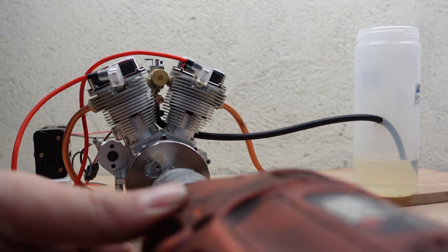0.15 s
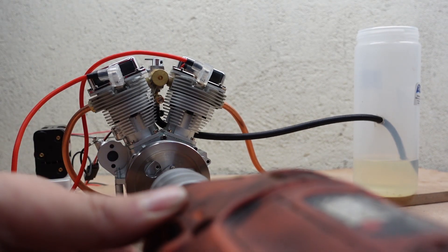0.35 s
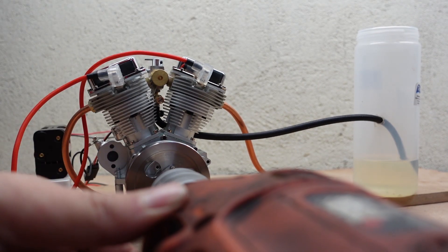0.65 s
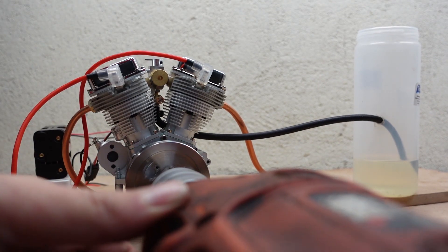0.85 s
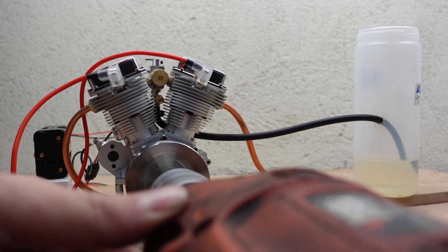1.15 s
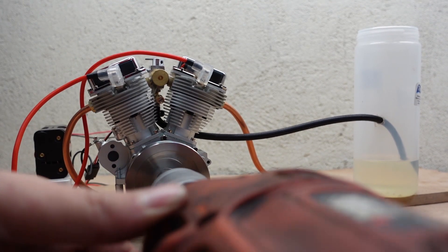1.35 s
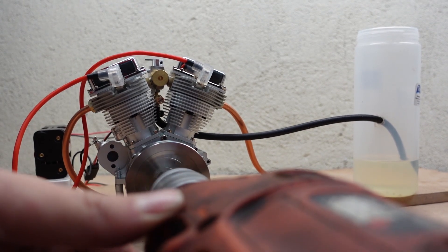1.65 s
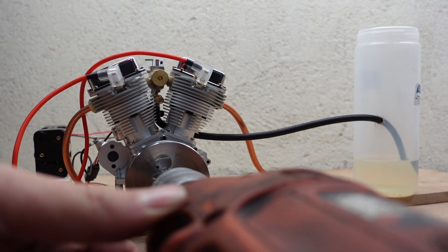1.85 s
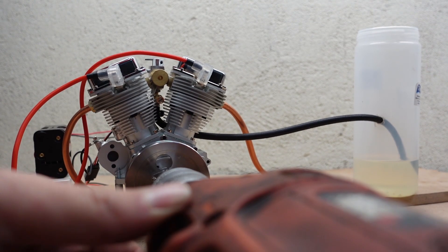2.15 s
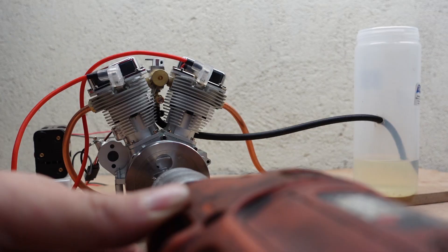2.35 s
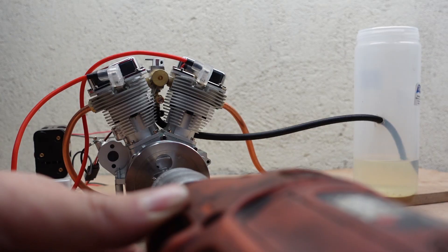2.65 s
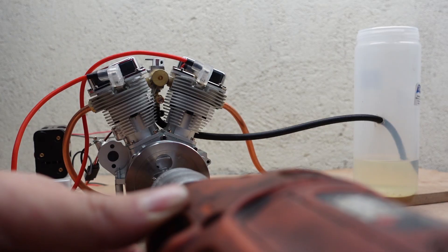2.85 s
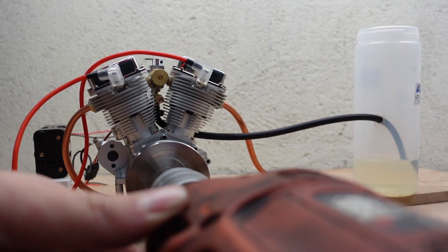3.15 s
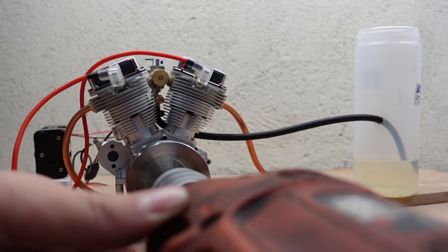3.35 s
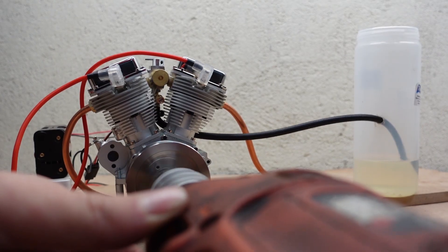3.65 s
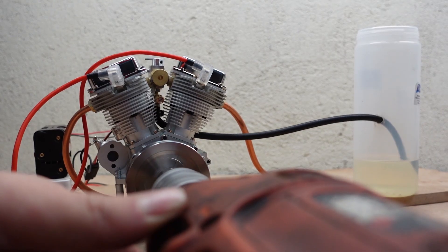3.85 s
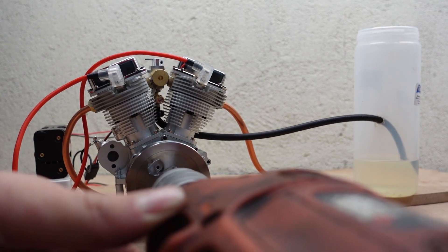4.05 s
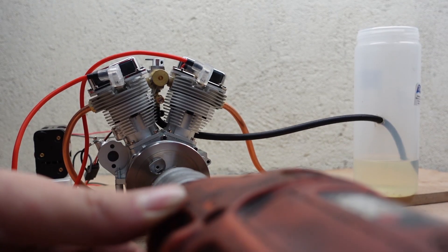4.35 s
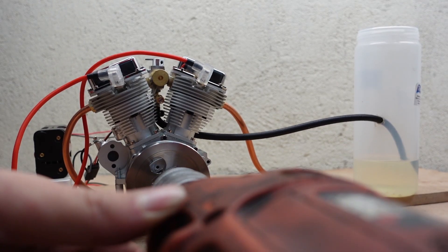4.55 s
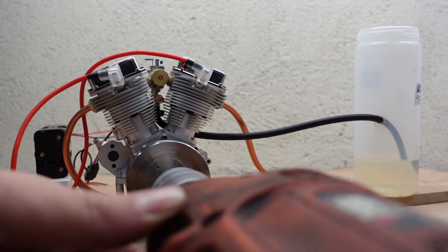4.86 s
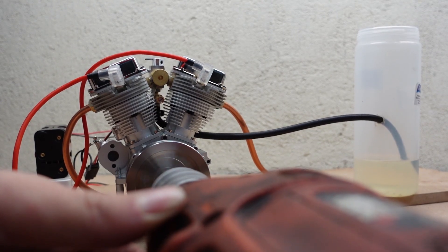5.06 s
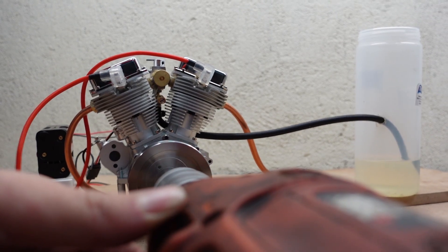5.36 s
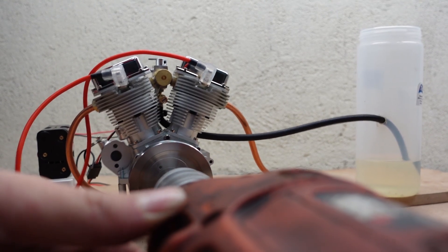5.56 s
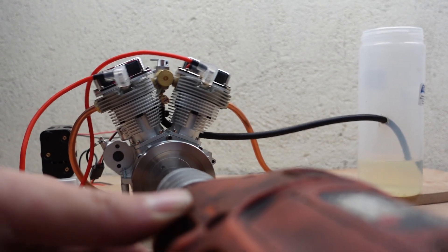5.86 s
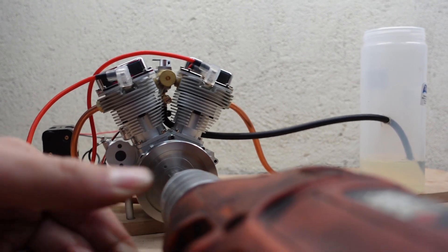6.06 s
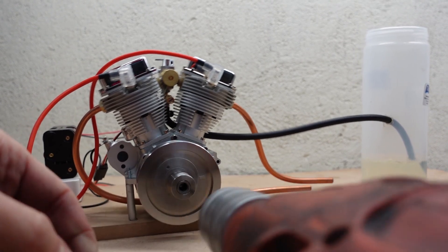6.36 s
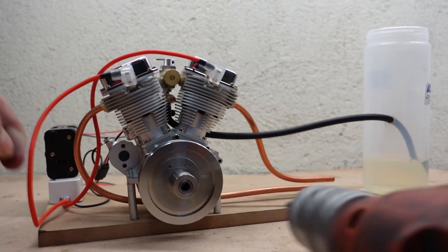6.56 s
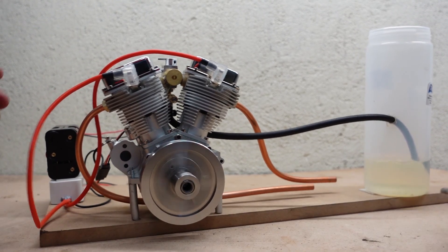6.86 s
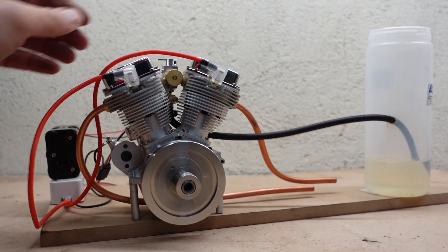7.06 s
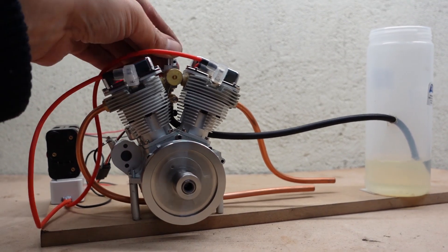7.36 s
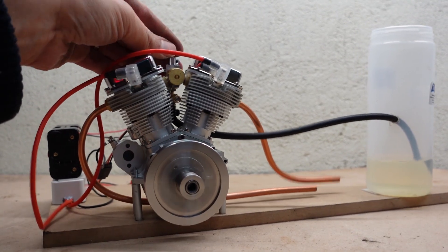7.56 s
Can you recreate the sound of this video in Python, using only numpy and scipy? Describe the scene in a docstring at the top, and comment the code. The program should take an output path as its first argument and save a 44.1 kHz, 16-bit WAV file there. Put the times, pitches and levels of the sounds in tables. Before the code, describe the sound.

A handheld electric drill whines and rattles in three bursts, cranking a tiny two-cylinder engine until it catches and pops along unevenly on its own.

```python
"""In a small room, a hand drill cranks a tiny two-cylinder engine on a wooden board, close to the microphone.
The gears rattle and the motor whines in three bursts: pitch and level curves drive noise, taps and partials.
Between bursts the hand resets the drill with small clicks of ringing plastic and soft rustle.
In the third burst the engine catches and runs on alone: cracks are pressure pulses, gas and clatter are
filtered noise. The board hums through resonances, and sparse echoes make the room."""
import sys
import numpy as np
from scipy import signal
from scipy.fft import rfft, irfft
from scipy.io import wavfile
from scipy.ndimage import uniform_filter1d

SR = 44100
rng = np.random.default_rng(int(sys.argv[2]) if len(sys.argv) > 2 else 0)


def output_pcm(signal):
    """Save a mono or channel-first signal as 16-bit PCM at the path in sys.argv[1].

    Samples are clipped to [-1, 1] before scaling.
    """
    pcm = np.clip(np.atleast_2d(signal).T, -1, 1) * 32767
    wavfile.write(sys.argv[1], SR, np.round(pcm).astype(np.int16))


N = 340011

# drill, one table a burst: time_s, motor_pitch_hz, gear_rattle_db, whine_db, lowest_partial_db
DRILL = [
    [(.307, 422.3, -25.5, -51, -62), (.37, 921, -23.5, -35, -52), (.41, 1152, -23.5, -26.5, -55),
     (.46, 1383, -24, -28.5, -32), (.57, 1290, -22, -38, -46.5), (.66, 1165, -22, -28, -46.5),
     (.78, 1056, -21.5, -25.5, -49), (.914, 938, -22, -28.5, -48), (.96, 830, -23, -25, -36.5),
     (1.01, 761.6, -20.5, -28.5, -53), (1.11, 685, -21, -29, -47), (1.2, 606.5, -21, -31, -43.5),
     (1.5, 388, -21, -43.5, -53), (1.8, 261, -22, -57.5, -63), (1.851, 248, -25, -60, -65),
     (1.88, 241, -34.5, -60, -65)],
    [(2.938, 497.3, -26, -50, -55.5), (2.975, 999.5, -23, -39, -46), (3.038, 1015, -23.5, -27, -57),
     (3.346, 754, -21.5, -30, -54), (3.6, 564, -21, -37, -50), (4.063, 314, -22, -60, -58),
     (4.15, 280, -23.5, -58, -65), (4.203, 260, -28.5, -60, -65), (4.225, 251, -70.5, -60, -65)],
    [(4.762, 300, -28, -50, -55), (4.792, 472.2, -21.5, -40, -42), (4.82, 802, -23, -31, -45),
     (4.875, 1147, -23.5, -26, -39), (5.068, 959.5, -21.5, -27.5, -44), (5.296, 767, -22.5, -30, -59),
     (5.5, 663, -22.5, -32, -56), (5.888, 380, -21.5, -60, -65), (6.218, 280, -26, -60, -65),
     (6.26, 269, -53, -60, -65)],
]
# spectrum of moving gas: freq_hz, density_db (per Hz)
GAS = [(2940, -14.5), (5000, -5.5), (7710, -0.5), (9290, 1.5), (10800, 2.5), (12000, 1.5), (13200, 5.5),
       (14900, 4), (15700, 6), (16200, -15)]
# spectrum of scraping and sliding: freq_hz, density_db (per Hz)
SCRAPE = [(180, -67.5), (300, -32.5), (543, -11.5), (685, -13), (1200, -17), (1510, -5.5), (2210, -3.5),
          (7020, -19.5), (9600, -26.5), (15500, -29)]


def gain_of(db):
    """Decibels to an amplitude factor."""
    return 10 ** (np.asarray(db) / 20)


def evened(x):
    """Scales to rms 1."""
    return x / np.sqrt(np.mean(x ** 2) + 1e-20)


def read(points, hz):
    """Reads a spectrum on a log frequency axis."""
    f, value = np.transpose(points)
    return np.interp(np.log(hz + 1), np.log(f + 1), value)


def play(rows):
    """Columns of a curve at every sample, and a gate that is open while it lasts."""
    s, *columns = np.transpose(rows)
    t = np.arange(N) / SR
    gate = np.interp(t, [s[0] - .003, s[0], s[-1], s[-1] + .01], [0, 1, 1, 0])
    return gate, [np.interp(t, s, c) for c in columns]


def swells(rows):
    """Summed smooth humps, one row of gains for each dB column."""
    t = np.arange(N) / SR
    total = 0
    for middle_s, length_s, *db in rows:
        hump = np.cos(np.pi * np.clip((t - middle_s) / length_s, -.5, .5)) ** 2
        total = total + gain_of(db)[:, None] * hump
    return total


def add(mix, s, sound):
    """Mixes a sound in at time s."""
    part = mix[round(s * SR):][:len(sound)]
    part += sound[:len(part)]


def colour(x, points, modes=()):
    """Causal filter of unit energy: a smooth spectrum with resonant lifts or dents."""
    hz = abs(np.fft.fftfreq(8192, 1 / SR))
    db = read(points, hz) + sum(lift / (1 + (2 * (hz - f) / w) ** 2) for f, w, lift in modes)
    log_gain = np.log(gain_of(np.maximum(db, -100)))
    # minimum phase: the filter responds as early as its spectrum allows
    taps = np.fft.ifft(np.exp(np.conj(signal.hilbert(log_gain)))).real[:2048]
    return signal.oaconvolve(x, taps / np.linalg.norm(taps))[:len(x)]


def resonate(x, hz, width):
    """A resonance of gain 1 and given width in Hz that follows the curve hz."""
    turn = np.exp(2j * np.pi * np.cumsum(hz * np.ones(len(x))) / SR)
    r = np.exp(-np.pi * width / SR)
    # shift the tone down to 0 Hz, smooth there, shift back
    return 2 * (turn * signal.lfilter([1 - r], [1, -r], x / turn)).real


def knocks(per_s, jitter, spread_db, ring_s):
    """Envelope of uneven knocks, each swelling and dying within a few ring_s."""
    wander = evened(uniform_filter1d(rng.standard_normal(N), size=300))
    turns = np.cumsum(per_s * np.maximum(1 + jitter * wander, 0)) / SR
    hits = np.diff(np.floor(turns), prepend=0) * gain_of(spread_db * rng.standard_normal(N))
    r = np.exp(-1 / (ring_s * SR))
    return evened(signal.lfilter([1], [1, -2 * r, r * r], hits))


def quiet():
    """Faint air of the room and hiss of the microphone: noise mostly common to both sides."""
    # background spectrum: freq_hz, density_db (per Hz)
    floor_points = [(18, -62), (30, -20.5), (245, -15.5), (319, -12), (355, -12), (384, -21), (569, -19),
                    (1540, -23.5), (9970, -36.5), (13000, -36), (16000, -34)]
    both, left, right = (colour(v, floor_points) for v in rng.standard_normal((3, N)))
    return gain_of(-69.5) * (both + .2 * np.array([left, right]))


def room(x):
    """Sparse echoes of random sign, partly shared by the two sides, each band dying at its own speed."""
    # reverberation: freq_hz, t60_s
    decay = [(150, 0.71), (1000, 0.46), (4000, 0.5), (9000, 0.54), (16000, 0.73)]
    taps = np.zeros((2, SR))
    # one echo in every 20 samples
    at = np.arange(100, SR - 20, 20) + rng.integers(0, 20, (2, (SR - 101) // 20))
    np.put_along_axis(taps, at, rng.choice([-1., 1.], at.shape), 1)
    hz, t, z = signal.stft(taps, SR, nperseg=256)
    tail = signal.istft(z * gain_of(-60 * t / read(decay, hz)[:, None]), SR, nperseg=256)[1]
    tail = tail + 0.5 * tail[::-1]
    return signal.fftconvolve(x[None], tail / np.linalg.norm(tail[0]), axes=1)[:, :N]


def ports(x):
    """The camera body and the table scatter the sound differently to the two microphone ports."""
    # left-right unlikeness of the near sound: freq_hz, side_db
    unlikeness = [(100, -25), (300, -16), (1000, -16), (2500, -25.5), (5000, -23), (15000, -15.5)]
    hz = np.fft.rfftfreq(2048, 1 / SR)
    k = np.arange(2048)
    scatter = rng.standard_normal(2048) * np.exp(-k / 250.) * (k > 60)
    taps = irfft(rfft(scatter / np.linalg.norm(scatter)) * gain_of(read(unlikeness, hz)))[:1500]
    side = signal.oaconvolve(x, taps)[:N]
    return np.array([x + side, x - side])


def board():
    """The crank shakes the board and keeps its modes humming; the third rings along with the second."""
    # steady shaking: time_s, low_mode_db, second_mode_db
    shake = [(.28, -86, -80), (.32, -61, -60.5), (.59, -81, -76), (1.4, -56, -59), (1.89, -57.5, -59),
             (2.27, -93.5, -92), (2.91, -70, -68.5), (2.95, -58, -62), (3.2, -56, -58), (3.59, -58, -62),
             (4.25, -54, -59.5), (4.54, -78, -85), (4.71, -90.5, -88), (4.77, -59, -68), (4.95, -51, -56.5),
             (5.23, -55, -54), (5.43, -41, -40), (6.3, -46, -33.5), (6.45, -42, -41), (7.71, -40, -39.5)]
    # throbs of the hum: middle_s, length_s, low_mode_db, second_mode_db
    throbs = [(1.6, .2, -46, -56), (3.66, 0.1, -46, -66), (3.9, 0.29, -46, -59), (4.2, .16, -42.5, -49),
              (5.33, 0.15, -41, -36), (5.74, 0.13, -33, -51), (6.03, 0.15, -34.5, -37),
              (6.32, 0.27, -41, -33), (6.54, 0.2, -40, -36), (6.71, 0.12, -36, -34),
              (6.79, .08, -41, -36.5), (6.87, 0.085, -33, -43), (6.92, 0.13, -50, -35.5),
              (7.01, 0.091, -36, -31), (7.17, 0.15, -39, -40), (7.33, 0.12, -38, -34),
              (7.58, 0.17, -40, -34), (7.7, 0.071, -38, -36)]
    # wooden modes: freq_hz, width_hz
    modes = [(117, 19), (184, 19), (350, 35)]
    gate, levels_db = play(shake)
    low, second = np.hypot(gate * gain_of(levels_db), swells(throbs))
    jolts = rng.standard_normal(N) * (.8 + knocks(33., .3, 1.5, 0.0044))
    out = np.zeros(N)
    for level, (hz, w) in zip((low, second, second * gain_of(-7.5)), modes):
        ring = evened(resonate(resonate(jolts, hz, w), hz, 2.9 * w))
        # partly level the ring's random swells, so the curves set the hum's loudness
        levelled = ring / (uniform_filter1d(ring ** 2, size=1300) + .1) ** 0.34
        out += level * evened(levelled)
    return out


def handling():
    """Plastic clicks: a noisy snap, a bright tick, a hollow knock and a short ring that shifts with the grip."""
    # trigger, chuck and hand, before the trims below: start_s, snap_and_ring_db, hollow_knock_db, bright_tick_db
    clicks = [(0.164, -48, -69.5, -62.5), (0.1984, -46.5, -61, -73.5), (0.2029, -36.5, -62, -58),
              (0.2134, -40.5, -49, -48), (0.2264, -38.5, -45, -33), (0.2583, -47, -51, -54),
              (0.2683, -47.5, -57, -60), (0.2867, -40, -52.5, -49), (0.3035, -19, -43.5, -36),
              (0.3086, -28, -35, -34), (2.2438, -50.5, -67, -67), (2.2897, -40, -49.5, -42.5),
              (2.302, -35, -53, -30), (2.333, -48, -54.5, -55), (2.3453, -45, -56, -61.5),
              (2.4169, -47, -56.5, -66), (2.5387, -37, -56.5, -39.5), (2.5775, -39.5, -49.5, -49),
              (2.5954, -34.5, -38.5, -51.5), (2.6248, -33, -43.5, -41), (2.6365, -30, -45.5, -21.5),
              (2.66, -37.5, -45, -41), (2.7327, -54, -58, -62.5), (2.7731, -30.5, -41, -39),
              (2.7838, -21, -30, -33), (2.886, -33.5, -53.5, -41), (2.8973, -30, -46.5, -22.5),
              (2.9193, -36, -46, -34), (2.9374, -12.5, -33, -21), (4.6848, -38.5, -70, -42),
              (4.7073, -43, -55, -56), (4.7174, -39, -52, -42), (4.7272, -35, -48, -26),
              (4.7451, -37, -43, -27), (4.7641, -15, -37, -23)]
    # shell modes, the lowest being the hollow knock: freq_hz, level_db, t60_s
    shell = [(552, 1, 0.027), (1190, -16.5, 0.014), (2440, -20, 0.031), (3400, -26, .04),
             (4860, -49.5, .04), (8200, -28, .04), (10400, -30.5, 0.043)]
    # fingers sliding on the drill, one table a spell: time_s, rustle_db
    rustle = [
        [(0.13, -82), (0.228, -62), (0.3, -66)],
        [(2.27, -63), (2.36, -68), (2.45, -77), (2.53, -80), (2.604, -53), (2.7, -70), (2.77, -51), (2.87, -63),
         (2.93, -55.5)],
        [(4.68, -73), (4.74, -50), (4.76, -59)],
    ]
    out, t = np.zeros(N), np.arange(4000) / SR
    grit = rng.standard_normal((len(clicks), 2, len(t)))
    grip = 1 + 0.047 * rng.standard_normal((len(clicks), len(shell)))
    hz, ring_db, t60 = np.transpose(shell)[:, :, None]
    rise = np.minimum(t / 0.002, 1)
    snap_band = signal.butter(2, [900, 5500], "band", fs=SR)
    snap = signal.lfilter(*snap_band, grit[:, 0]) * np.exp(-t / 0.0024)
    tick = signal.lfilter(*signal.butter(2, 5500, "high", fs=SR), grit[:, 1]) * np.exp(-t / 0.0013)
    for k, (s, db, knock_db, tick_db) in enumerate(clicks):
        hollow, *upper = gain_of(ring_db - 60 * t / t60) * np.sin(2 * np.pi * hz * grip[k, :, None] * t)
        click = gain_of(db + 6.0) * (snap[k] + sum(upper))
        click += gain_of(tick_db + 7.0) * tick[k]
        click += gain_of(knock_db + 4.5) * hollow
        add(out, s, rise * click)
    slide = sum(gate * gain_of(db) for gate, (db,) in map(play, rustle))
    rubbing = evened(.3 + knocks(110.0, 1.0, 5., 0.0031)) * rng.standard_normal(N)
    return out + colour(slide * rubbing, SCRAPE)


def chuck():
    """The chuck coasts on after the second burst: slow uneven knocks shape scraping noise."""
    # coasting: time_s, scrape_db
    coast = [(4.21, -62), (4.242, -46.5), (4.376, -41), (4.442, -46), (4.47, -63)]
    gate, (db,) = play(coast)
    scrape = evened(0.36 + knocks(100., 0.36, 3.2, 0.0024)) * rng.standard_normal(N)
    return colour(gate * gain_of(db) * scrape, SCRAPE)


def motor():
    """Commutator partials glide with the motor, coloured by the case; the speed control whistles at fixed pitch,
    beside short gliding tones."""
    # levels of partials 2 and 3 against the whine: level_db
    partials_db = 0., -3.5
    # resonance of the case: freq_hz, level_db
    whine_body = [(900, -15), (1420, -10), (1520, -1.5), (2400, -1), (3300, -3), (4200, -15)]
    # short gliding tones, among them the whistle sliding down as a burst starts:
    # start_s, length_s, first_hz, last_hz, level_db
    glides = [(2.94, .06, 4450, 4150, -27), (4.762, 0.061, 4400, 3900, -27), (.5, .2, 1640, 1400, -33),
              (0.47, .1, 3800, 2820, -33), (0.85, 0.11, 3050, 2690, -25), (.53, .11, 15800, 14400, -41.5),
              (.48, .14, 13600, 12200, -47.5)]
    # steady whistle of the speed control, lower tone and octave: pitch_hz
    whistle_hz = 4316, 8910
    # its two tones through a burst, before the trim below: level_db
    whistle_db = -37, -45.5
    # its swells above that, before the same trim: middle_s, length_s, lower_tone_db, octave_db
    whistle_swells = [(.33, .1, -30, -28), (.83, .08, -29, -42), (1.14, 0.13, -23.5, -46),
                      (1.55, .06, -28, -34), (1.68, 0.16, -28, -33.5), (1.8, 0.11, -30, -38),
                      (1.87, 0.069, -31, -47), (2.95, 0.15, -23, -24), (3.8, 0.31, -29, -33.5),
                      (4.04, 0.11, -28.5, -31.5), (4.77, 0.051, -20.5, -31), (5.7, 0.086, -40, -31),
                      (6.03, .1, -38, -29), (6.17, .16, -35, -36)]
    out, whistle = np.zeros(N), np.zeros((2, N))
    flutter = 1 + .3 * evened(uniform_filter1d(rng.standard_normal((3, N)), size=400, axis=1))
    whistle_level = gain_of(whistle_db)[:, None] + swells(whistle_swells)
    for rows in DRILL:
        gate, (hz, _, whine_db, low_db) = play(rows)
        turns = np.cumsum(hz) / SR
        whistle += gate * whistle_level
        upper_db = [whine_db + db + read(whine_body, (k + 2) * hz) for k, db in enumerate(partials_db)]
        for k, db in enumerate([low_db, *upper_db]):
            out += gate * gain_of(db) * np.sqrt(2) * flutter[k] * np.sin(2 * np.pi * (k + 1) * turns)
    for s, length, first_hz, last_hz, db in glides:
        hz = np.linspace(first_hz, last_hz, round(length * SR))
        swell = np.sqrt(2 * np.hanning(len(hz)))
        add(out, s, gain_of(db) * swell * np.sin(2 * np.pi * np.cumsum(hz) / SR))
    # narrow noise gives the whistle its wavering tone
    tones = [evened(resonate(resonate(rng.standard_normal(N), hz, w), hz, w))
             for hz, w in zip(whistle_hz, (150., 50.))]
    return out + gain_of(-5.0) * (whistle * tones).sum(0)


def dips():
    """Gain of the gear noise, which drops briefly as if a piston came against compression."""
    # brief drops: middle_s, depth_db, length_ms
    drops = [(.987, -10, 7.5), (1.053, -23, 8.4), (1.095, -7, 13.7), (1.176, -16, 7.2), (1.215, -10, 11),
             (1.446, -4, 11), (4.082, -10, 25), (4.111, -2, 11), (5.486, -7.5, 13), (5.728, -4, 9),
             (5.868, -4.5, 18.5), (5.904, -5.5, 25), (5.952, -5, 14), (6.037, -8, 8.6), (6.128, -16, 7.9)]
    t = np.arange(N) / SR
    return gain_of(sum(db * np.exp(-(2000 * (t - s) / ms) ** 2) for s, db, ms in drops))


def gears():
    """Teeth slap in the gearbox: gated noise and taps ring the housing; the fan hisses above, the case growls below."""
    # rattle spectrum: freq_hz, density_db (per Hz)
    rattle_points = [(350, -47.5), (600, -13.5), (853, -1.5), (1440, -2.5), (1570, 0.5), (3000, 4),
                     (4210, -3.5), (5170, -7), (5790, -8), (6550, -19), (9000, -35), (11700, -36.5),
                     (19800, -120)]
    # ringing housing: freq_hz, width_hz, lift_db
    housing = [(835, 160, 0.5), (1568, 59, 6), (1777, 55, 4), (2233, 230, 4), (2930, 440, 1),
               (3970, 340, 6.5), (5720, 47, 9), (6930, 47, 20.5)]
    # fan hiss spectrum: freq_hz, density_db (per Hz)
    air_points = [(3530, -28.5), (6000, 1), (6570, -4.5), (8300, -7), (9190, -8), (11600, -12),
                  (15100, -17), (16000, -19.5)]
    # case growl spectrum: freq_hz, density_db (per Hz)
    growl_points = [(60, -36.5), (150, -17), (230, -11), (300, -7), (500, -2), (650, 2), (900, -3),
                    (1500, -30.5)]
    # at free speed, against the rattle: fan_hiss_db, case_growl_db, lumpiness (0-1)
    at_speed = (-8.5, -32.5, 0.22)
    # change of these per octave of slowing: fan_hiss_db, case_growl_db, lumpiness
    per_octave = (-3., 7.5, 0.18)
    free_hz = 1400
    levels, lumpy = np.zeros((3, N)), np.zeros(N)
    for rows in DRILL:
        gate, (hz, db, *_) = play(rows)
        slowing = np.log2(free_hz / hz)
        air_db, growl_db, lump = np.c_[at_speed].T + np.c_[per_octave].T * slowing
        levels += gate * gain_of([db, db + air_db, db + growl_db])
        lumpy += gate * np.clip(lump, 0, 1)
    gating = 1 - lumpy + lumpy * knocks(170, .5, 3.2, 0.00094)
    # level the gating over time, so that lumpiness leaves loudness alone
    noise = rng.standard_normal((3, N)) * gating / np.sqrt(uniform_filter1d(gating ** 2, size=6000) + 1e-9)
    struck = rng.random(N) < 350 / SR  # about 350 taps per second
    taps = struck * rng.choice([-1., 1.], N) * rng.uniform(.5, 1, N)
    taps = evened(taps * np.sqrt(gating))
    share = 0.6 * lumpy
    slaps = np.sqrt(1 - share) * noise[0] + np.sqrt(share) * taps
    rattle, air, growl = dips() * levels * [slaps, noise[1], noise[2]]
    return colour(rattle, rattle_points, housing) + colour(air, air_points) + colour(growl, growl_points)


def running():
    """Tappets and timing gears clatter in the ringing cylinders over the hiss of the intake."""
    # valve gear: time_s, clatter_db
    clatter = [(6.0, -34), (6.26, -31.5), (6.414, -31), (7.076, -36), (7.294, -37.5), (7.71, -32.5)]
    # intake: time_s, hiss_db
    intake = [(5.2, -49), (5.54, -47), (5.91, -40), (6.21, -40), (6.56, -41.5), (7.3, -40.5), (7.71, -39.5)]
    # clatter spectrum: freq_hz, density_db (per Hz)
    metal = [(150, -42.5), (250, 6), (287, -7), (351, 4), (464, -11.5), (833, -4), (1280, -11),
             (1480, -5.5), (1980, -4), (2310, -2), (3000, 1), (4480, -5.5), (10000, -13), (13000, -50),
             (22000, -120)]
    # ring of the cylinders: freq_hz, width_hz, lift_db
    fins = [(796, 870, 4.5), (2990, 97, 8), (5500, 110, 8), (6670, 70, 5), (7740, 160, 7), (10480, 220, 7),
            (12800, 150, -21), (14600, 160, -7)]
    gate, (db,) = play(clatter)
    ticks = rng.standard_normal(N) * evened(1 + 1.4 * knocks(120., .8, 0.67, 0.002))
    open_, (hiss_db,) = play(intake)
    hiss = rng.standard_normal(N) * evened(1 + .5 * knocks(50., 0.42, 12.0, 0.0045))
    return colour(gate * gain_of(db) * ticks, metal, fins) + colour(open_ * gain_of(hiss_db) * hiss, GAS, fins)


def valves():
    """Gas leaking past a valve wheezes: noise swells and fades, tuned by the passages."""
    # wheezes: middle_s, level_db, length_ms (at half height)
    wheezes = [(6.427, -35, 9.2), (6.695, -34, 10), (6.785, -42, 11), (6.81, -35, 12), (6.95, -34, 8.3),
               (7.055, -33, 22), (7.085, -39, 10), (7.275, -30, 12), (7.325, -39, 12), (7.365, -28.5, 11),
               (7.407, -30, 11), (7.44, -40, 7.3), (7.475, -31, 12), (7.51, -31, 14), (7.54, -30, 14),
               (7.62, -32.5, 46), (7.66, -32.5, 23)]
    # resonant passages: freq_hz, width_hz, lift_db
    passages = [(3020, 250, 10), (6700, 150, 17), (7650, 160, 13), (10610, 360, 12.5), (14500, 300, -4)]
    leak = np.zeros(N)
    for s, db, ms in wheezes:
        add(leak, s - ms / 1000, gain_of(db) * np.hanning(round(2 * ms * SR / 1000)))
    return colour(leak * rng.standard_normal(N), GAS, passages)


def cracks_and_puffs():
    """Each crack is a pressure pulse, a dull thump and a short rasp in the pipe; puffs are bright gas jets."""
    # cracks and gas puffs of the engine, as drive levels: time_s, crack_db, gas_puff_db
    firings = [(5.2546, -27, -20), (5.2895, -33, -32), (5.381, -28, -28), (5.4143, -12, -23),
               (5.442, -32, -28), (5.4758, -19, -28), (5.5034, -32, -29), (5.5657, -25, -25),
               (5.6012, -32, -26), (5.6261, -17, -23), (5.688, -36, -23), (5.7445, -10, -19),
               (5.774, -18, -30), (5.8007, -32, -29), (5.8323, -17, -23), (5.8576, -32, -29),
               (5.8885, -32, -20), (5.9118, -14, -19), (5.9676, -18, -21), (5.997, -19, -24),
               (6.0238, -17, -18), (6.055, -11, -23), (6.116, -22, -23), (6.1423, -20, -22),
               (6.1744, -13, -24), (6.2368, -11, -21), (6.2631, -14.5, -19.5), (6.296, -25, -26),
               (6.3242, -19, -24), (6.3605, -14, -20), (6.3869, -13.5, -20), (6.4848, -11, -25),
               (6.513, -14, -18), (6.619, -11.5, -25), (6.6506, -12.5, -21), (6.723, -18, -19),
               (6.7655, -11, -20.5), (6.797, -14, -22), (6.875, -19, -18.5), (6.9215, -9.5, -21),
               (6.9555, -13.5, -18), (7.0871, -12.5, -20), (7.1233, -18, -19.5), (7.249, -12.5, -20),
               (7.284, -14.5, -18), (7.414, -13.5, -18), (7.446, -13, -20), (7.546, -11.5, -19),
               (7.5738, -18, -15), (7.6796, -13.5, -30)]
    # rasp spectrum of the pipe: freq_hz, level_db
    pipe = [(250, -25), (550, 6), (800, 9.5), (1250, -14), (1950, 7), (2900, 0.5), (4500, -0.5),
            (7000, -12), (10000, -19)]
    out, rasp, jet, t = np.zeros(N), np.zeros(N), np.zeros(N), np.arange(1200) / SR
    u, slow = t / 0.00013 - 2, t / 0.0055
    pulse = -2.3 * u * np.exp(-u ** 2)
    pulse += 0.11 * slow * (1 - slow) * np.exp(-slow)  # dull thump
    pulse += 0.25 * np.exp(-t / 0.0013) * np.sin(2 * np.pi * 1950 * t) * (u > 0)  # the pipe mouth rings on
    rasp_shape = np.exp(-(t / 0.0015) ** 2)
    jet_shape = np.minimum(t / 0.0015, 1) * np.exp(-(t / 0.0038) ** 1.55)
    for s, crack_db, puff_db in firings:
        # rasp grows 0.39 dB per dB of crack; under -25 dB it fades faster
        rasp_db = -18.5 + 0.39 * (crack_db + 13.5) + np.minimum(crack_db + 25, 0)
        add(out, s - .0002, gain_of(crack_db) * pulse)
        add(rasp, s + .0004, gain_of(rasp_db) * rasp_shape)
        add(jet, s - .0005, gain_of(puff_db - 1.5) * jet_shape)
    return out + colour(rasp * rng.standard_normal(N), pipe) + colour(jet * rng.standard_normal(N), GAS)


def scene():
    """All sources sit close in front; the board's bass leans a little left."""
    near = gears() + chuck() + motor() + cracks_and_puffs() + valves() + running() + handling()
    low = board()
    direct = ports(near) + low * gain_of([[.5], [-.5]])
    echoes = gain_of(-12.5) * room(near) + gain_of(-10.5) * room(low)
    return direct + echoes + quiet()


def record(dry):
    """The input stage rounds the peaks and drops the deep bass; then the top is cut off."""
    soft = 0.54 * np.tanh(dry / 0.56)
    thin = signal.sosfilt(signal.butter(3, 55., "high", fs=SR, output="sos"), soft)
    top_cut = signal.firwin(401, 15950, window=("kaiser", 7), fs=SR)
    return signal.oaconvolve(thin, top_cut[None], "same")


dry = scene()
out = record(dry)
output_pcm(out)
```